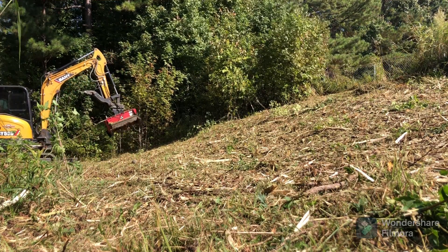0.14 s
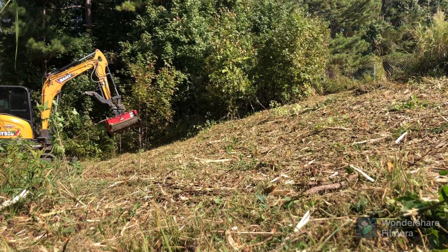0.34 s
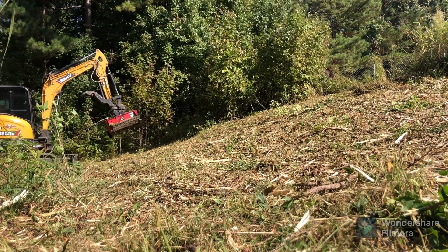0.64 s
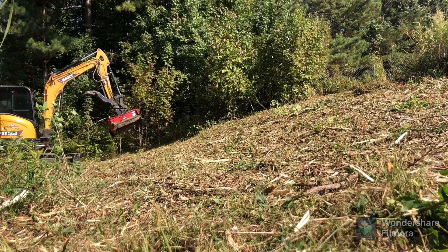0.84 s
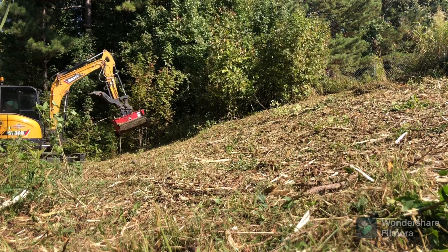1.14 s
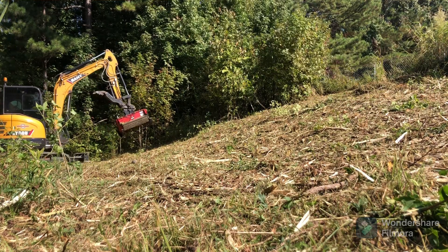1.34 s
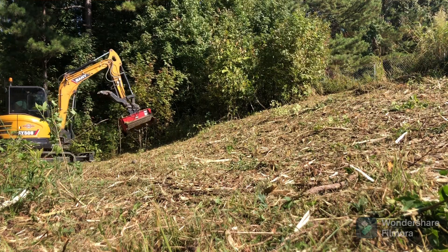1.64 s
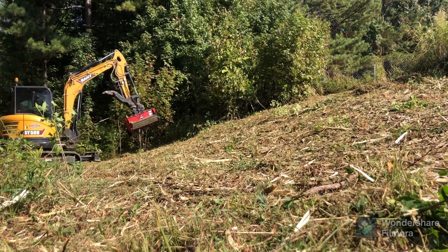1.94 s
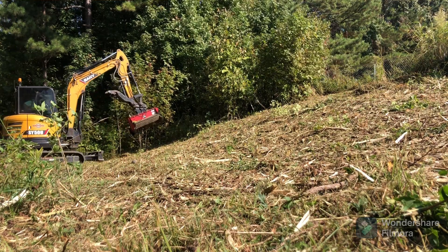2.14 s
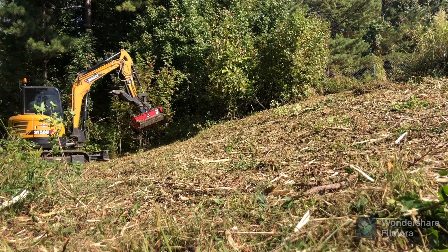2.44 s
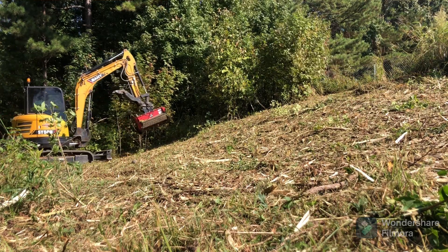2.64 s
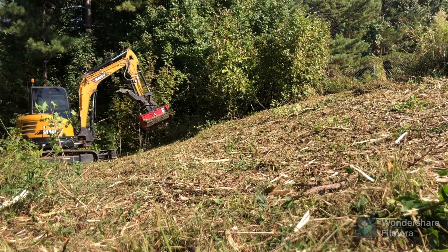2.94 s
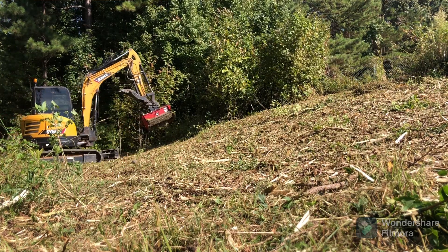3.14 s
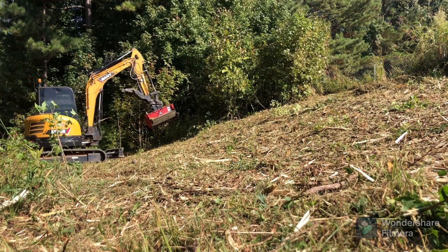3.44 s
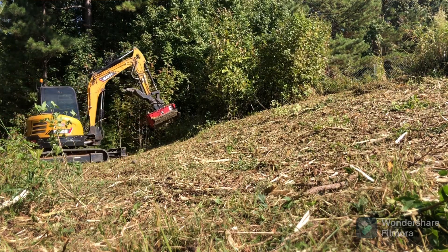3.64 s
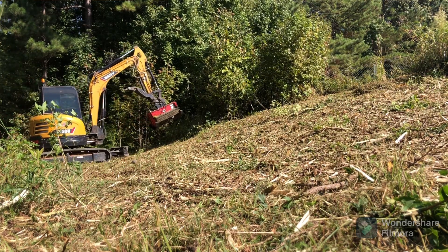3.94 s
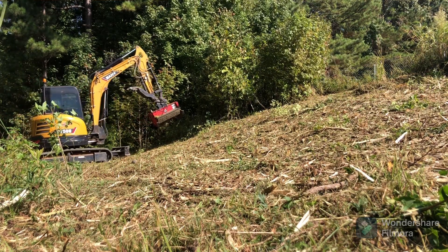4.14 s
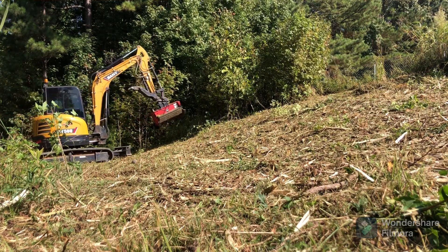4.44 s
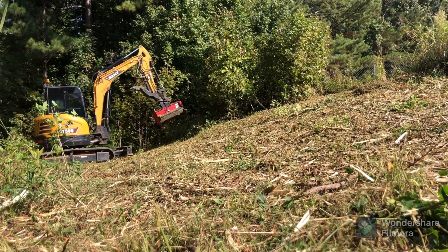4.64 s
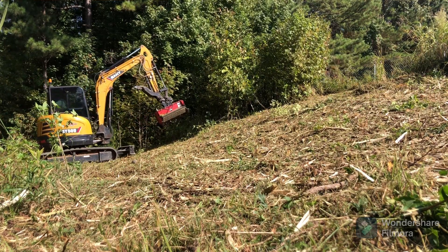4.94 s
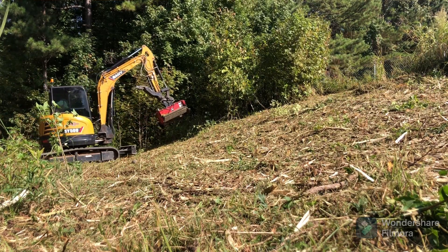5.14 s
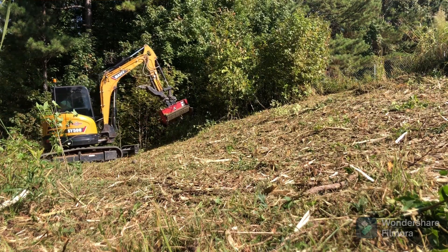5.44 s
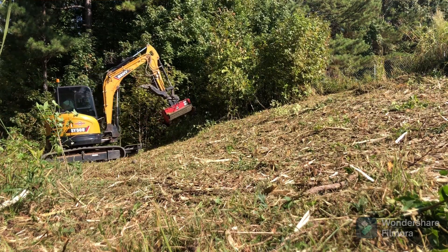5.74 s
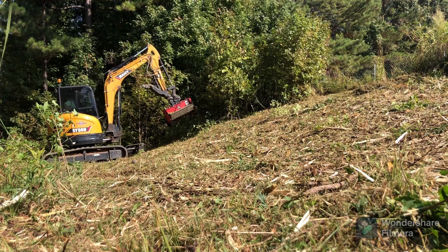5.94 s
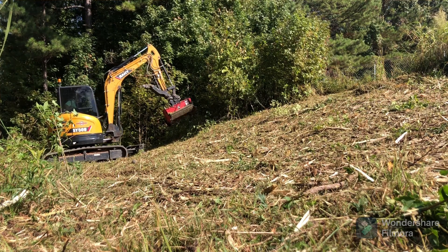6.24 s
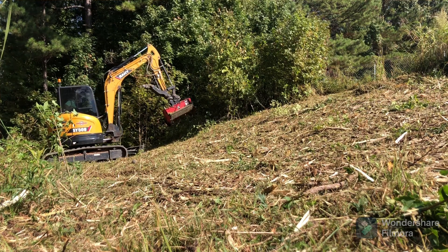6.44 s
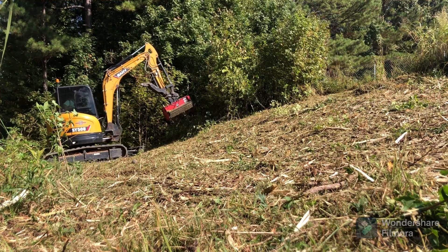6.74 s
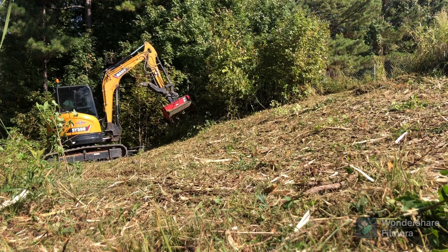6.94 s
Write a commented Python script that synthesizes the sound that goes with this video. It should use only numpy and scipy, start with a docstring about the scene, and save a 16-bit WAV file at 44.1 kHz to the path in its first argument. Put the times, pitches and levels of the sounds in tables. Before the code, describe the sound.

A diesel excavator drones steadily with fuel-gear ticking and fan roar as its tracks clank over litter, wood knocks and one sharp twig crack near the start.

```python
"""A four-cylinder diesel excavator crawls and chews brush with a flail mulcher.
The exhaust is a set of steady tones locked to the firing beat; injector ticks and pump tones follow the beat too.
Wood thuds, knocks and snaps are short bursts ringing at their own pitch, and track pads clank in three soft tones.
A very high squeal, perhaps a katydid-like insect near the microphone, comes and goes, and a thin whine comes
in spells: both are narrow noise. Shaped noise makes rumble, flails, fan roar, air hiss and a ringing housing."""
import sys
import numpy as np
from scipy import signal
from scipy.io import wavfile
from scipy.ndimage import uniform_filter1d, map_coordinates

SR = 44100
rng = np.random.default_rng(int(sys.argv[2]) if len(sys.argv) > 2 else 0)


def waveform_to_disk(signal):
    """Save audio, clipped to [-1, 1], as 16-bit WAV at the path in sys.argv[1]."""
    frames = np.transpose(np.atleast_2d(signal))
    scaled = np.clip(frames, -1, 1) * 32767
    samples = np.round(scaled).astype(np.int16)
    wavfile.write(sys.argv[1], SR, samples)


N = 313110  # length in samples


def gain_of(db):
    """Turns decibels into a factor."""
    return 10 ** (np.asarray(db) / 20)


def evened(x):
    """Scales a sound to an average (rms) level of 1."""
    return x / np.sqrt(np.mean(x ** 2) + 1e-20)


def curves(rows):
    """Draws straight lines between the rows of a table: one curve for each column after the time."""
    times_s, *columns = np.transpose(rows)
    return [np.interp(np.arange(N) / SR, times_s, column) for column in columns]


def resonate(x, hz, width_hz):
    """Rings at one pitch with gain 1: shifts hz down to zero, smooths, and shifts back."""
    turn = np.exp(2j * np.pi * np.cumsum(hz * np.ones(len(x))) / SR)
    keep = np.exp(-np.pi * width_hz / SR)
    smooth = signal.lfilter([1 - keep], [1, -keep], x / turn + 1e-18)
    return 2 * (turn * smooth).real


def body(x, modes):
    """Adds up a set of resonances; each is passed twice, for steeper sides."""
    out = 0
    for hz, width_hz, db in modes:
        out = out + gain_of(db) * resonate(resonate(x, hz, width_hz), hz, width_hz)
    return out


def wander(hz):
    """Smooth random drift of rms 1, through about hz random points a second."""
    knots = rng.standard_normal(int(N / SR * hz) + 4)
    return evened(map_coordinates(knots, [np.linspace(1, len(knots) - 2, N)], order=3))


def noise(points, size, patchy_db, flicker_db, lo_hz, hi_hz):
    """Noise from random short spectra with drifting patches and a shared flicker, rms 1 from lo_hz to hi_hz."""
    frames, hz = 4 * N // size + 5, np.fft.rfftfreq(size, 1 / SR)
    real, imaginary, patches = rng.standard_normal((frames, len(hz), 3)).T
    patches = uniform_filter1d(patches, size=10, axis=0)  # smooth across pitch
    patches = evened(uniform_filter1d(patches, size=8, axis=1))  # smooth in time
    flicker = evened(uniform_filter1d(rng.standard_normal(frames), size=3))
    points_hz, points_db = np.transpose(points)
    shape = gain_of(np.interp(np.log(hz + 1), np.log(points_hz + 1), points_db))
    change = gain_of(patchy_db * patches + flicker_db * flicker)
    spectra = (real + 1j * imaginary) * shape[:, None] * change
    sound = signal.istft(spectra, nperseg=size, noverlap=3 * size // 4)[1][:N]
    in_band = (hz > lo_hz) & (hz < hi_hz)
    share = np.sum(shape[in_band] ** 2) / np.sum(shape ** 2)
    return evened(sound) / np.sqrt(share)


# heard firing rate, with brief bends probably from the sound's path through air,
# and the two lowest exhaust tones (1 and 2 times that rate):
# time_s, firings_per_s, first_level_db (rms), second_level_db (rms)
FIRING_BEAT = [(0, 60.2, -36.5, -35), (.3, 59.74, -35.5, -37), (.6, 59.72, -34, -35),
               (.8, 58.56, -33, -32.5), (1.05, 59.93, -33.5, -31.5), (1.5, 60.03, -34, -32),
               (2.45, 60.13, -33, -31.3), (2.7, 59.99, -33.5, -31.5), (3.0, 60.25, -34, -31.5),
               (3.6, 60.16, -33, -32.2), (4.5, 60.19, -33.5, -32), (5.3, 60.07, -33.5, -32.5),
               (5.95, 60.33, -33, -32), (6.12, 61.91, -34.5, -35.5), (6.45, 60.48, -35, -38),
               (6.7, 58.42, -35.5, -33), (6.9, 60.05, -33, -31), (7.1, 61.42, -33, -39)]
# third exhaust tone (3 times the firing rate): time_s, level_db (rms)
THIRD_TONE = [(0, -49), (.35, -45.5), (.8, -51), (1.1, -43), (2.2, -45), (2.8, -47.5), (3.6, -43),
              (5.1, -41), (5.3, -48), (5.6, -42), (5.9, -44), (7.1, -45)]
# head start of the three tones in their cycles after the pipe: phase_radians for each tone
PIPE_PHASES = (0, 3.3, 4.2)
# weaker tones: higher multiples of the firing rate, and in-between ones from unequal cylinders:
# multiple_of_firing_rate, level_db (rms)
WEAKER_TONES = [(1.5, -58), (1.75, -54), (2.75, -54), (3.25, -57), (4, -57), (4.5, -57), (6, -60),
                (6.5, -64), (7, -62), (7.5, -62), (9, -64), (9.75, -66)]


def exhaust():
    """Three strong tones of the firing beat and weaker ones between and above; moving air makes them waver."""
    hz, first_db, second_db = curves(FIRING_BEAT)
    angle = 2 * np.pi * np.cumsum(hz + .15 * wander(4)) / SR
    firing = angle + .11 * np.sin(angle / 4)  # the four cylinders fire a little early or late in turn
    first_db = first_db + 0.89 * wander(7)
    second_db = second_db + 0.41 * wander(9)
    third_db = curves(THIRD_TONE)[0] + 2.1 * wander(7)
    out = np.zeros(N)
    for k, db, phase in zip((1, 2, 3), (first_db, second_db, third_db), PIPE_PHASES):
        out += gain_of(db) * np.cos(k * firing + phase)
    shared_db = first_db - first_db.mean()  # weaker tones rise and fall with the first
    for k, db in WEAKER_TONES:
        level = gain_of(db + shared_db + 2.74 * wander(3))
        out += level * np.cos(k * angle + 2 * np.pi * rng.random())
    return np.sqrt(2) * out


# ticks within one firing: share_of_period, level_db (relative)
TICK_PLACES = [(.28, 0), (.53, -8), (.84, -2.5)]
# resonances of the fuel gear: pitch_hz, width_hz (each pass), level_db (relative)
FUEL_GEAR = [(4720, 130, -2), (4770, 620, 0), (3300, 1200, -13), (6000, 1500, -15)]
# loudness of the ticking: time_s, level_db (rms)
TICK_LEVEL = [(0, -68), (.2, -54), (.5, -58.5), (.9, -53.5), (1.4, -53), (1.6, -59), (2.1, -60),
              (2.4, -51.5), (3.8, -51.5), (4.08, -52), (4.26, -50), (4.6, -53), (5.3, -50), (6, -55),
              (6.5, -61), (6.92, -51), (7.1, -61)]


def injectors():
    """A click and a short puff at fixed places in each firing make the fuel gear ring."""
    turns = np.cumsum(curves(FIRING_BEAT)[0]) / SR  # firings so far
    shape = (int(turns[-1]) + 2, len(TICK_PLACES))
    strength = gain_of(2.0 * rng.standard_normal(shape)) * rng.choice([-1, 1], shape)
    drive, hiss = np.zeros(N), rng.standard_normal(N)
    for k, (place, db) in enumerate(TICK_PLACES):
        stroke = np.floor(turns - place).astype(int)
        click = np.diff(stroke, prepend=stroke[0])
        puff = hiss * np.exp(-(turns - place - stroke) / .04)  # dies over .04 of a firing
        drive += gain_of(db) * strength[stroke, k] * (6 * click + puff)
    return gain_of(curves(TICK_LEVEL)[0] + .8 * wander(11)) * evened(body(drive, FUEL_GEAR))


# hydraulic pump tones: pitch_hz (at the average firing rate), level_db (rms before the blur)
PUMP_TONES = [(262, -57), (524, -62), (706, -66), (1049, -63.5), (1309, -62.5), (2508, -79)]


def pump():
    """Piston tones that follow the heard firing rate, blurred by changing pressure."""
    hz = curves(FIRING_BEAT)[0]
    angle = 2 * np.pi * np.cumsum(hz / hz.mean()) / SR
    out = np.zeros(N)
    for tone_hz, db in PUMP_TONES:
        blur = gain_of(2.5 * wander(7)) * np.exp(1.3j * wander(14))  # in level and in phase
        out += np.sqrt(2) * gain_of(db) * (blur * np.exp(1j * tone_hz * angle)).real
    return out


def blow(modes, burst_s, rough):
    """One hit: a spike and a dying burst of noise make the resonances ring, peak 1."""
    t = np.arange(3000) / SR
    burst = rough * rng.standard_normal(len(t)) * np.exp(-t / burst_s)
    sound = body(signal.unit_impulse(len(t)) + burst, modes)
    return sound / abs(sound).max()


# dull thuds of stems in the housing: start_s, level_db (peak), pitch_hz
STEM_THUDS = [(0.06, -32, 275), (0.378, -40, 262), (0.516, -29.5, 238), (0.981, -30, 251),
              (1.124, -26.5, 244), (2.104, -30, 259), (2.845, -29, 300), (3.419, -30, 242),
              (3.954, -32, 292), (4.191, -33, 263), (4.38, -33, 266), (4.578, -30.5, 268),
              (5.256, -34, 404), (5.585, -32, 297), (5.898, -30, 250), (5.968, -48, 247),
              (6.497, -34.5, 233), (6.734, -34, 265)]
# resonances of a stem: multiple_of_pitch, width_hz (each pass), level_db (relative)
STEM_MODES = [(1, 75.5, 12.5), (1.55, 91, -2), (2.3, 120, -13)]


def thuds():
    """Stems hit the housing and ring low and briefly."""
    out = np.zeros(N + 3000)
    for start_s, db, hz in STEM_THUDS:
        thud = blow([(hz * k, w, d) for k, w, d in STEM_MODES], burst_s=0.0063, rough=0.059)
        out[round(start_s * SR):][:3000] += gain_of(db) * thud
    return out[:N]


# wood struck by the flails: start_s, level_db (peak of the ring), pitch_hz, brightness_db (edge against ring)
WOOD_KNOCKS = [(0.052, -33.5, 1370, -16), (0.218, -34, 2240, 1), (0.501, -26, 1560, -8),
               (0.769, -25.5, 1630, -8), (1.283, -26, 1510, -15), (1.295, -32, 2850, -11),
               (1.32, -42, 1010, -18), (1.337, -30, 1590, -18), (1.392, -26, 1710, -8),
               (1.551, -32, 2160, -5), (1.956, -33, 1380, -14), (2.072, -27, 1740, -6),
               (2.132, -39, 1300, -3), (2.67, -37, 1310, -9), (2.701, -32, 2060, -8),
               (2.844, -34, 2850, -14), (3.52, -29.5, 1680, -4), (3.869, -35, 1950, -19),
               (4.569, -38, 1260, -17), (5.48, -35, 1310, -22), (5.833, -35.5, 1660, -8),
               (7.006, -31, 1670, -4)]
# resonances of the wood: multiple_of_pitch, width_hz (each pass), level_db (relative)
WOOD_MODES = [(1, 420, 0), (.62, 400, -9), (1.5, 600, -9)]


def knocks():
    """Struck wood rings at its own pitch, with a bright edge around 4800 Hz."""
    out = np.zeros(N + 3000)
    for start_s, db, hz, bright_db in WOOD_KNOCKS:
        ring = blow([(hz * k, w, d) for k, w, d in WOOD_MODES], burst_s=0.004, rough=0.085)
        edge = gain_of(bright_db) * blow([(4800, 2200, 0)], burst_s=0.0015, rough=0.54)
        out[round(start_s * SR):][:3000] += gain_of(db) * (ring + edge)
    return out[:N]


# dry twig snaps: start_s, level_db (peak), pitch_hz, width_hz (scaled for each resonance below)
TWIG_SNAPS = [(.011, -46, 10000, 2500), (.034, -42, 11000, 4000), (.164, -31, 10800, 1500),
              (.170, -44, 9500, 2500), (0.213, -29, 6500, 4000), (0.3454, -7, 9850, 4800),
              (.543, -46, 12500, 3000), (.87, -44, 12500, 3000), (3.519, -46, 6500, 3000),
              (3.602, -43, 7000, 2500), (3.953, -36, 8500, 2000), (5.947, -41, 7000, 3000),
              (6.724, -45, 7000, 3000), (7.006, -46, 7000, 3000)]
# resonances of a twig: multiple_of_pitch, multiple_of_width, level_db (relative)
TWIG_MODES = [(1, 1, 7), (.53, .5, 2.5), (1.5, 1, 7)]


def snaps():
    """A breaking twig gives a spike and a short rustle in wide, high resonances."""
    out = np.zeros(N + 3000)
    for start_s, db, hz, width_hz in TWIG_SNAPS:
        snap = blow([(hz * k, width_hz * w, d) for k, w, d in TWIG_MODES], burst_s=0.0015, rough=0.035)
        out[round(start_s * SR):][:3000] += gain_of(db) * snap
    return out[:N]


# track pads rolling over the sprocket: time_s, level_db (before the changes for each tone)
PAD_CLANKS = [(1.02, -41), (1.16, -38), (1.30, -38.5), (1.44, -37.5), (1.579, -38.5), (1.73, -36),
              (1.87, -34), (2.01, -36), (2.151, -34.5), (2.285, -37.5), (2.43, -38), (2.58, -37.5),
              (2.71, -41), (2.86, -40), (2.995, -38.5), (3.16, -43), (3.32, -47), (3.486, -41), (3.64, -44),
              (3.87, -55), (4.01, -50)]
# tones of a pad; the low ones sound as the pad settles: pitch_hz, delay_s, level_db (relative)
PAD_TONES = [(623.6, 0.0019, -6.5), (440.2, .026, -1), (297.2, 0.023, -0.5)]
# litter crushed under a pad: pitch_hz, width_hz (each pass), level_db (relative)
LITTER = [(302, 150, 4), (472, 250, -7)]
CRUNCH_DB = -5  # crunch against the clank


def tracks():
    """Each pad swells and fades in three tones, a little detuned and unevenly struck, and crushes litter."""
    out, t = np.zeros(N + SR), np.arange(4000) / SR
    middle = t.mean()
    swell = np.exp(-((t - middle) / 0.011) ** 2)
    crunch_swell = np.exp(-((t - middle) / 0.023) ** 2)
    crunch = evened(body(rng.standard_normal(N + SR), LITTER))
    for (time_s, db), chance in zip(PAD_CLANKS, rng.random((len(PAD_CLANKS), 9))):
        at = round((time_s + .022 - middle) * SR)  # the crunch comes .022 s late
        out[at:][:4000] += gain_of(db + CRUNCH_DB) * crunch[at:][:4000] * crunch_swell
        for k, (hz, delay_s, tone_db) in enumerate(PAD_TONES):
            detuned_hz = hz * (1 + 0.057 * (chance[k] - .5))
            ring = np.sin(2 * np.pi * (detuned_hz * t + chance[3 + k]))
            peak = gain_of(db + tone_db + 4.6 * (chance[6 + k] - .5))
            out[round((time_s + delay_s - middle) * SR):][:4000] += peak * swell * ring
    return out[:N]


# very high squeals: start_s, swell_s, level_db (rms at the top of the swell), fall_db_per_s
SQUEAL_TIMES = [(.004, 0.008, -40.5, 200), (.09, .098, -41, 250), (.21, .024, -40, 240),
                (.344, .004, -55, 200), (.5, 0.076, -52, 450), (.59, .035, -51, 160),
                (.785, .012, -64, 300), (.856, .11, -44, 230), (1.118, .01, -60, 500),
                (1.197, .01, -54, 110), (1.447, .035, -59, 170), (1.55, .017, -46, 220),
                (2.2, .045, -71, 300), (2.286, .01, -67, 200), (3.642, .024, -64, 230),
                (3.949, .02, -62, 280), (5.937, .03, -67, 150), (6.314, .014, -68, 500),
                (6.376, .008, -54, 160), (6.926, .01, -68, 160), (6.966, .01, -56, 400),
                (7.02, .08, -54, 200)]
# bands of the squeal: pitch_hz, width_hz (each pass), level_db (relative)
SQUEAL_BANDS = [(15230, 150, 0), (15400, 330, -5), (15620, 200, -10), (14600, 900, -22)]
SQUEAL_RISE_DB = 11  # a squeal sets in this far under its peak


def squeals():
    """Noise in narrow bands near the top of hearing: each squeal sets in, swells and dies."""
    t, level = np.arange(N) / SR, np.zeros(N)
    for start_s, swell_s, db, fall_db in SQUEAL_TIMES:
        first = round(start_s * SR)
        part = slice(first, first + SR // 2)
        since_peak = t[part] - start_s - swell_s
        slope_db = np.minimum(SQUEAL_RISE_DB * since_peak / swell_s, -fall_db * since_peak)
        level[part] = np.maximum(level[part], gain_of(db + slope_db))
    band = resonate(rng.standard_normal(N), 15350, 700)  # steepens the lower edge
    return level * gain_of(1.5 * wander(60)) * evened(body(band, SQUEAL_BANDS))


# spells of a thin hydraulic whine: start_s, end_s, first_pitch_hz, last_pitch_hz, level_db (rms before the fades)
WHINE_SPELLS = [(0.049, .2, 2040, 2080, -55.5), (.41, .47, 2310, 2310, -54), (.56, .66, 2330, 2310, -54),
                (.79, 0.862, 2300, 2300, -55), (1.45, 1.7, 2200, 2210, -57),
                (3.926, 4.216, 1650, 1627, -51), (4.391, 4.75, 1630, 1580, -56.5),
                (5.206, 5.7, 1640, 1654, -51), (5.752, 6.3, 1625, 1610, -57),
                (6.71, 7.1, 1680, 1630, -52.5)]


def whines():
    """Narrow noise that sets in quickly, glides or holds its pitch, and fades out quickly."""
    out = np.zeros(N + SR)
    for start_s, end_s, first_hz, last_hz, db in WHINE_SPELLS:
        count = round((end_s - start_s) * SR)
        glide_hz = np.linspace(first_hz, last_hz, count)
        tone = evened(body(rng.standard_normal(SR)[:count], [(glide_hz, 25, 0)]))
        out[round(start_s * SR):][:count] += gain_of(db) * tone * signal.windows.tukey(count, .15)
    return out[:N]


# colour of the flail noise: pitch_hz, level_db (per Hz, relative)
FLAIL_COLOUR = [(200, -44), (290, -9), (350, 0), (450, -1.5), (540, -5.5), (650, -9), (760, -15),
                (950, -60)]
# loudness of the flails in brush: time_s, level_db (rms from 340 to 750 Hz)
FLAIL_LEVEL = [(0, -44), (.2, -51), (.75, -50), (1.05, -44.5), (2.5, -44.5), (3.05, -44.5), (3.7, -47.5),
               (5.15, -48), (5.35, -47.5), (5.9, -50.5), (6.2, -52), (7.1, -52)]


def flails():
    """Lumpy noise of the flails as they work in brush."""
    sound = noise(FLAIL_COLOUR, size=1024, patchy_db=1.2, flicker_db=.8, lo_hz=340, hi_hz=750)
    return gain_of(curves(FLAIL_LEVEL)[0] + 0.75 * wander(9)) * sound


# colour of the rumble: pitch_hz, level_db (per Hz, relative)
RUMBLE_COLOUR = [(28, -40), (40, -4), (50, -18), (80, -6.5), (125, -7.5), (200, -6), (280, -8.5),
                 (340, -23.5), (420, -51.5)]
# loudness of the rumble: time_s, level_db (rms from 200 to 340 Hz)
RUMBLE_LEVEL = [(0, -43), (1.3, -43), (1.6, -44.5), (2, -42), (3.3, -41), (3.8, -45), (5.0, -44.5),
                (5.7, -43.5), (6.3, -46), (6.57, -42.5), (7.1, -45)]


def rumble():
    """Lumpy low noise of the machine."""
    sound = noise(RUMBLE_COLOUR, size=4096, patchy_db=0.5, flicker_db=0.3, lo_hz=200, hi_hz=340)
    return gain_of(curves(RUMBLE_LEVEL)[0] + 0.76 * wander(9)) * sound


# colour of the fan noise: pitch_hz, level_db (per Hz, relative)
FAN_COLOUR = [(500, -48), (700, -7), (850, -8.5), (1040, -3.5), (1190, -5), (1630, -3), (2300, -4),
              (3000, -6.5), (3930, -9.5), (4700, -10), (5400, -10.5), (6300, -15.5), (7500, -46),
              (9000, -58)]
# loudness of the fan: time_s, level_db (rms from 800 to 4000 Hz)
FAN_LEVEL = [(0, -42.5), (.2, -46), (1.0, -44.5), (1.3, -44), (2.2, -44.5), (3.1, -44.5), (4, -45),
             (5, -44.5), (6, -44.5), (6.6, -46), (7.1, -45)]


def fan_roar():
    """Broad noise of the fan."""
    sound = noise(FAN_COLOUR, size=512, patchy_db=0.84, flicker_db=0.51, lo_hz=800, hi_hz=4000)
    return gain_of(curves(FAN_LEVEL)[0]) * sound


# ringing of the housing: time_s, level_db (rms before its drift)
HOUSING_LEVEL = [(0, -77), (3.2, -70), (3.5, -59), (4.3, -62.5), (5.3, -58.5), (6.5, -58), (7.1, -56)]


def housing_ring():
    """Noise makes the housing ring at 1650 Hz, with a drifting level."""
    ring = evened(body(rng.standard_normal(N), [(1650, 110, 0)]))
    return gain_of(curves(HOUSING_LEVEL)[0] + 2.5 * wander(4)) * ring


# colour of the air hiss: pitch_hz, level_db (per Hz, relative)
AIR_COLOUR = [(5000, -18), (6500, 18), (7500, 15.5), (10000, 12.5), (11800, 8), (13500, 6), (15800, 4),
              (16100, -70)]
# loudness of the air hiss: time_s, level_db (rms from 7000 to 13000 Hz)
AIR_LEVEL = [(0, -56.5), (.5, -60.5), (.9, -58.5), (2, -62.5), (2.4, -59.5), (3.3, -61.5), (4.7, -60.5),
             (5.5, -62.5), (5.9, -61.5), (6.5, -65), (6.9, -62.5), (7.1, -64)]


def air_hiss():
    """High, soft noise of air."""
    sound = noise(AIR_COLOUR, size=512, patchy_db=.9, flicker_db=.8, lo_hz=7000, hi_hz=13000)
    return gain_of(curves(AIR_LEVEL)[0] + 0.43 * wander(9)) * sound


HISS_S, HISS_LENGTH_S, HISS_DB, HISS_HZ = 4.14, 0.58, -65, 11800


def thin_hiss():
    """One faint band of noise that swells and fades."""
    share = np.clip((np.arange(N) / SR - HISS_S) / HISS_LENGTH_S, 0, 1)
    sound = evened(body(rng.standard_normal(N), [(HISS_HZ, 700, 0)]))
    return gain_of(HISS_DB) * np.sin(np.pi * share) * sound


def scene():
    """Adds up all sources, heard from one spot."""
    engine = exhaust() + injectors() + pump()
    wood = thuds() + knocks() + snaps()
    passing_sounds = tracks() + squeals() + whines()
    background = flails() + rumble() + fan_roar() + housing_ring() + air_hiss() + thin_hiss()
    return (engine + wood + passing_sounds + background)[None]


EDGE_HZ = 15800  # upper band limit


def record(dry):
    """The microphone cuts the deepest bass; a steep filter then removes what lies above the band limit."""
    bass_cut = signal.butter(2, 33, "high", fs=SR, output="sos")
    dry = signal.sosfiltfilt(bass_cut, dry)
    band_limit = signal.firwin(1023, EDGE_HZ, window=("kaiser", 9), fs=SR)
    return signal.oaconvolve(dry, band_limit[None], "same")


dry = scene()
out = record(dry)
waveform_to_disk(out)
```